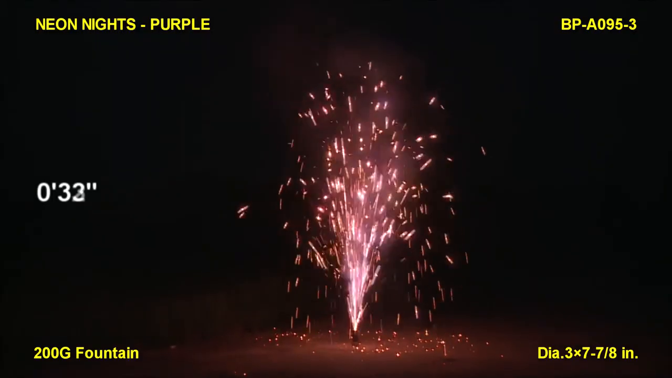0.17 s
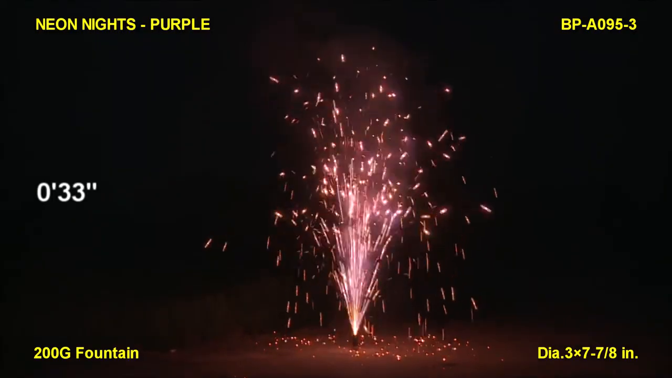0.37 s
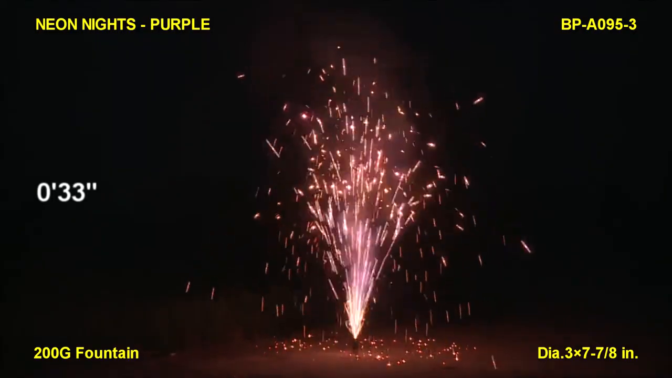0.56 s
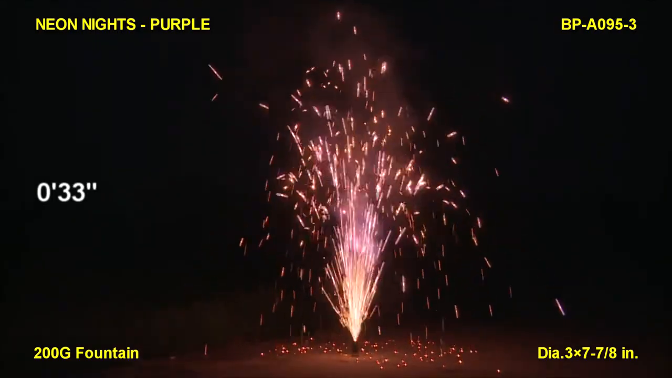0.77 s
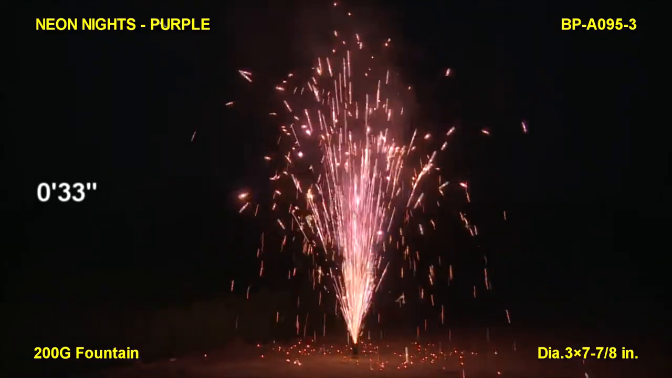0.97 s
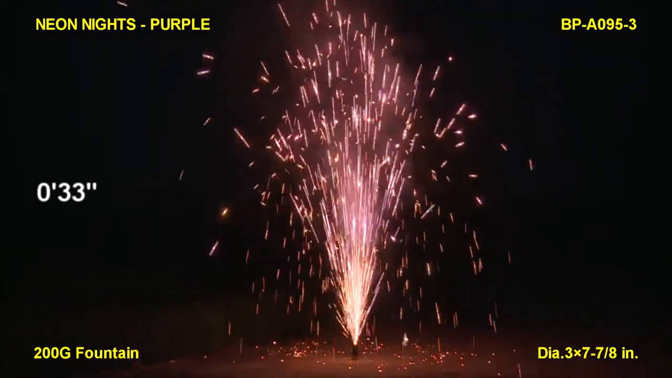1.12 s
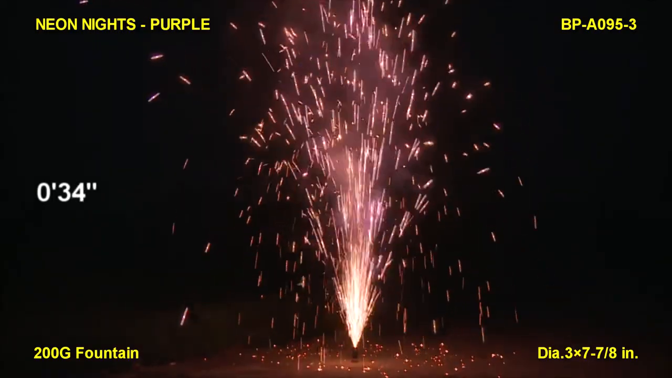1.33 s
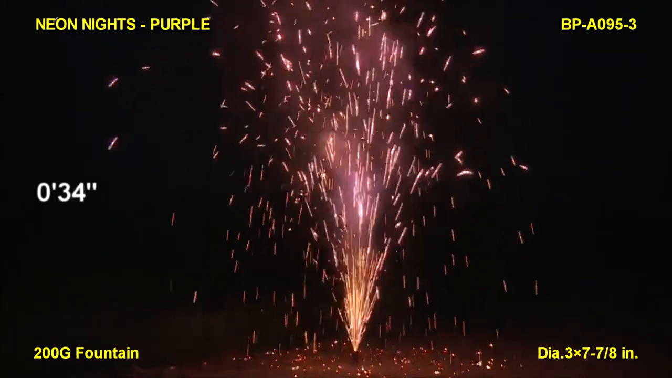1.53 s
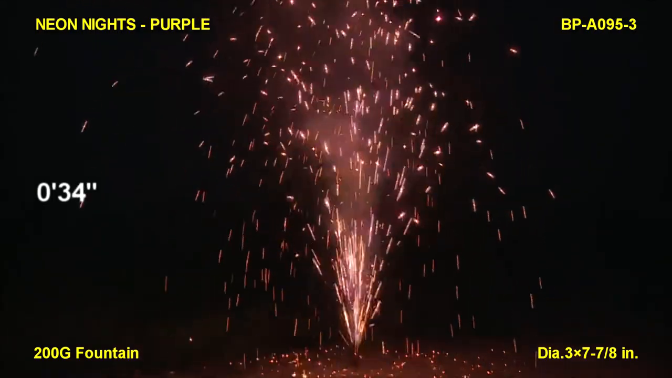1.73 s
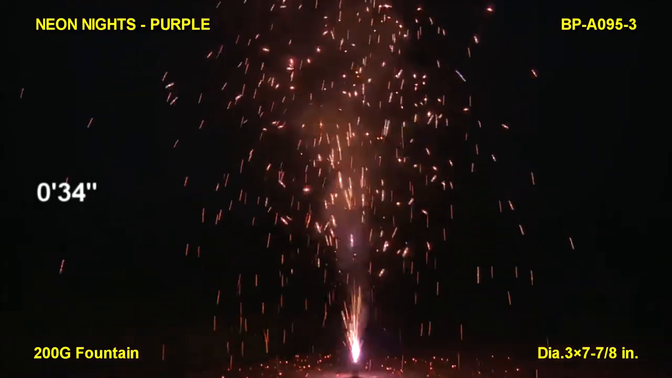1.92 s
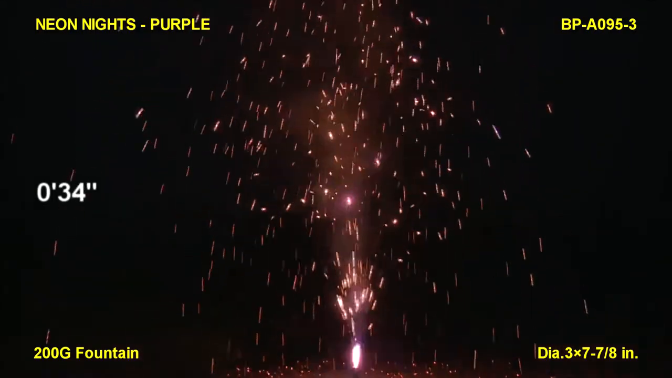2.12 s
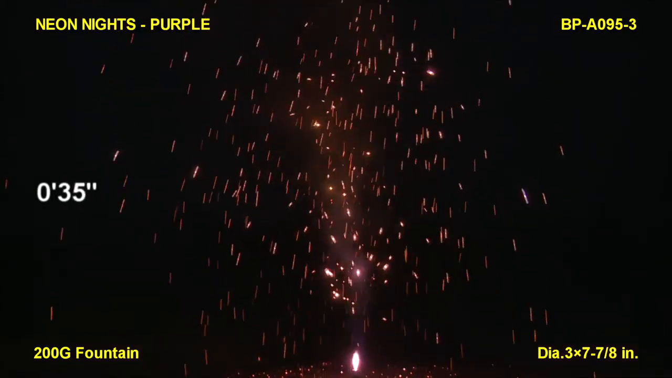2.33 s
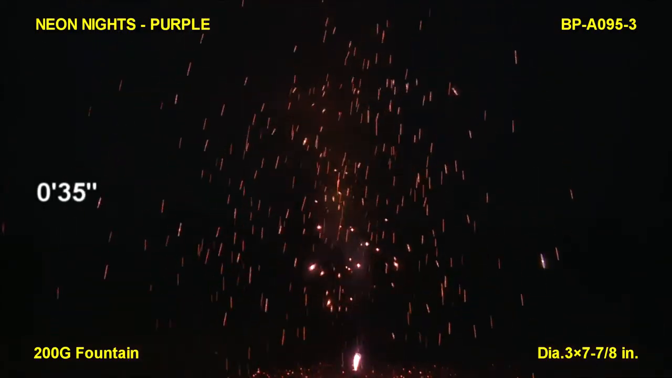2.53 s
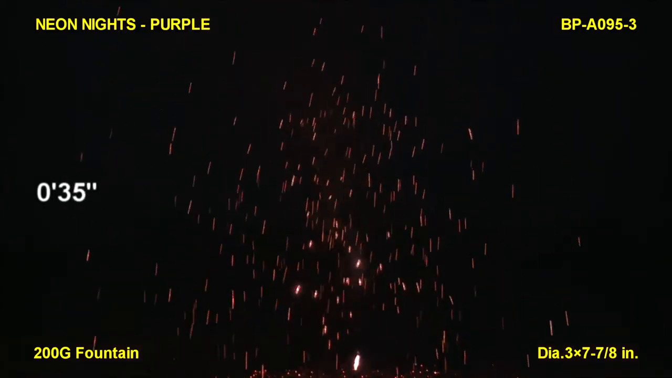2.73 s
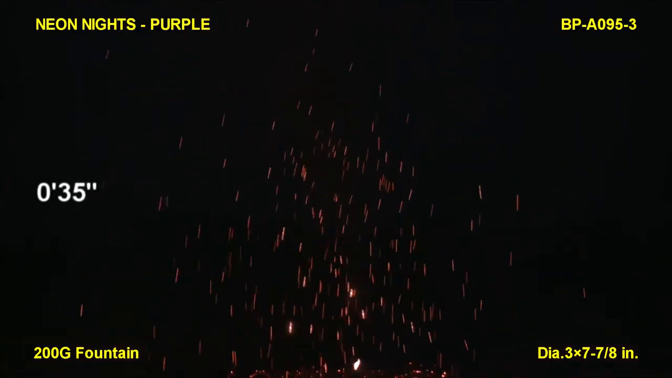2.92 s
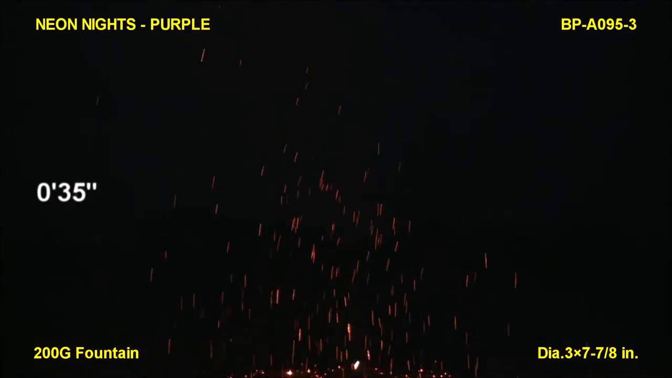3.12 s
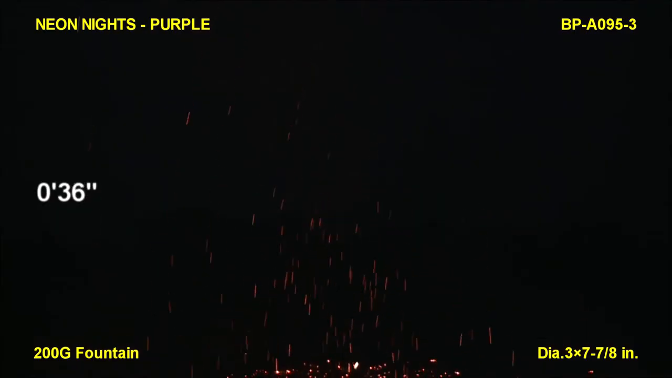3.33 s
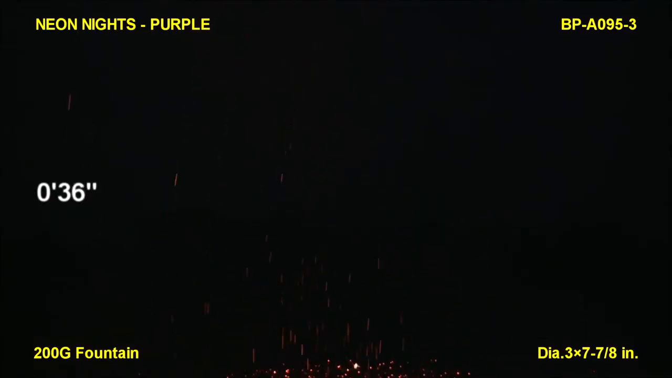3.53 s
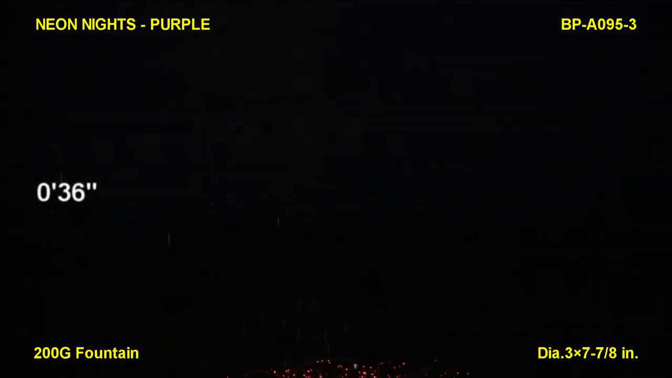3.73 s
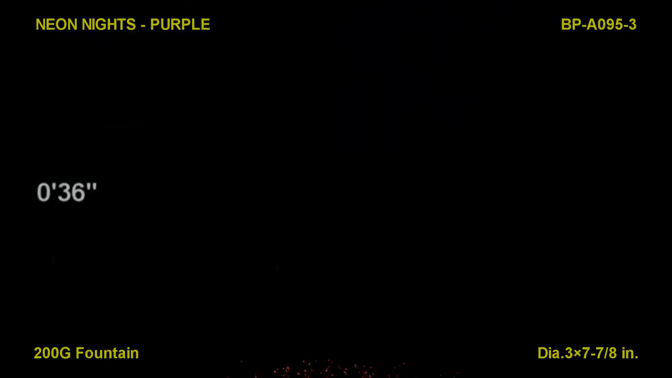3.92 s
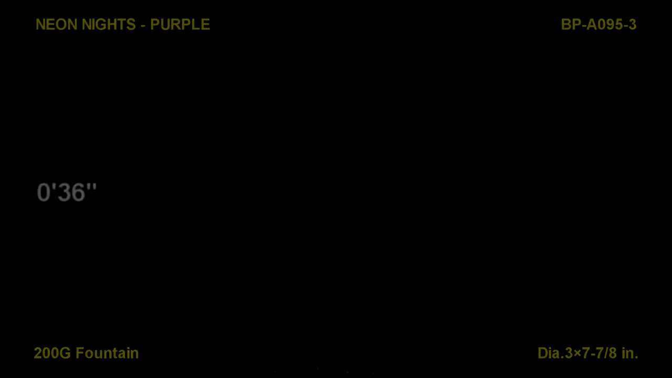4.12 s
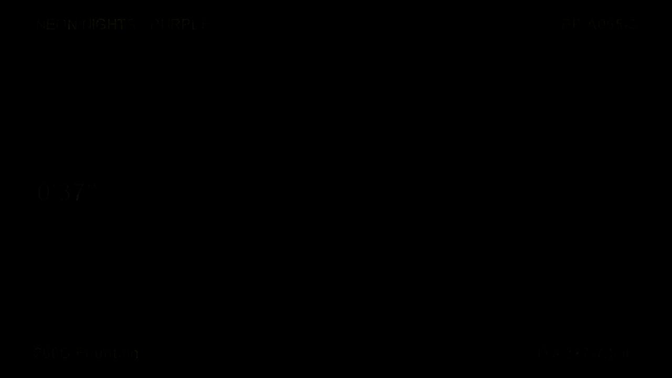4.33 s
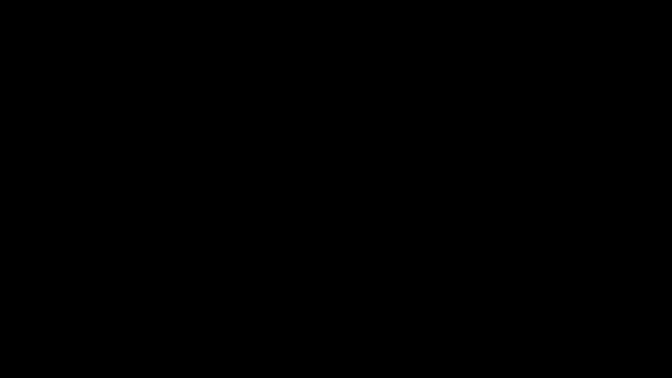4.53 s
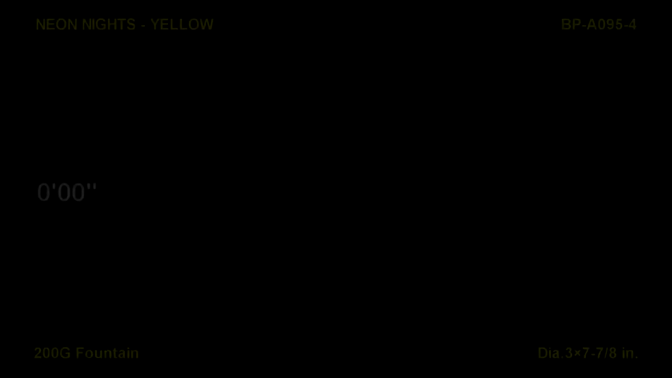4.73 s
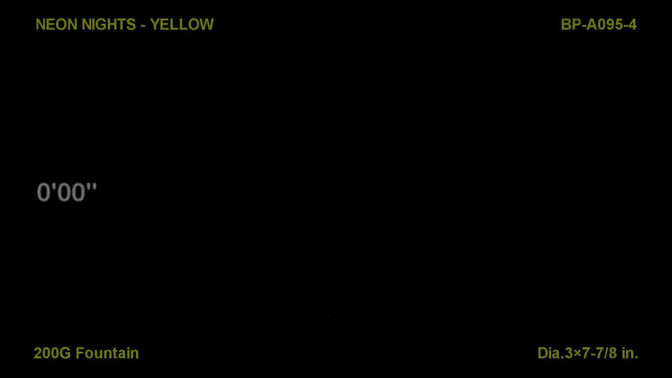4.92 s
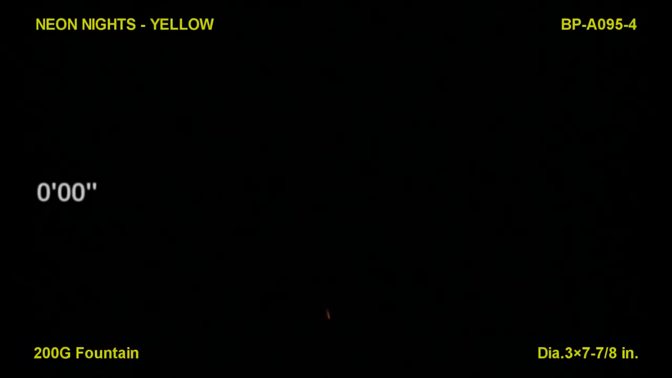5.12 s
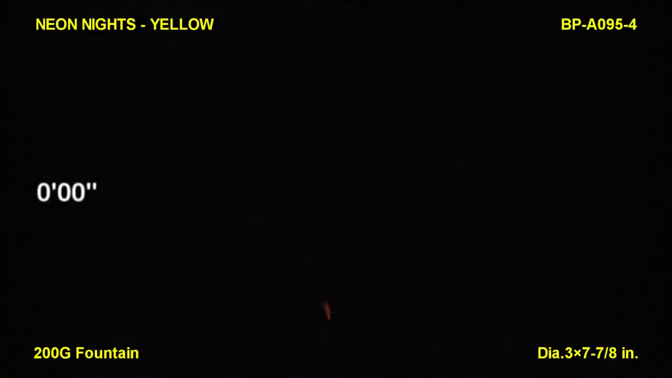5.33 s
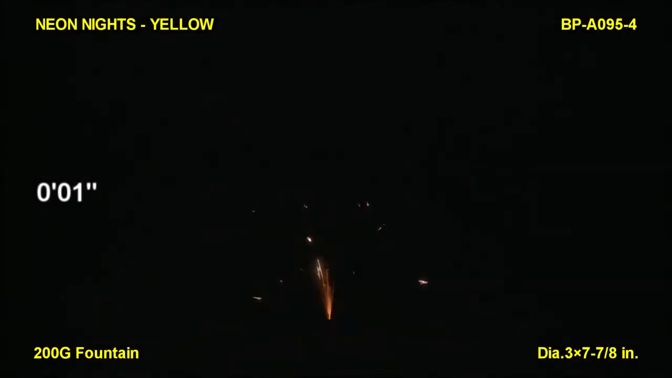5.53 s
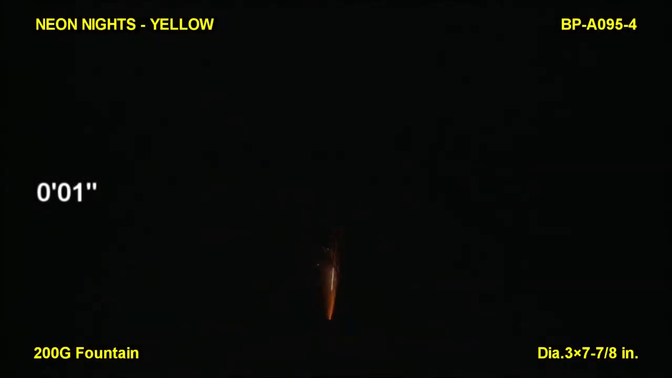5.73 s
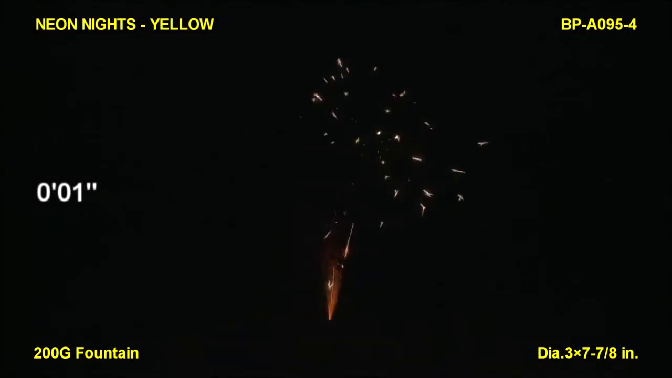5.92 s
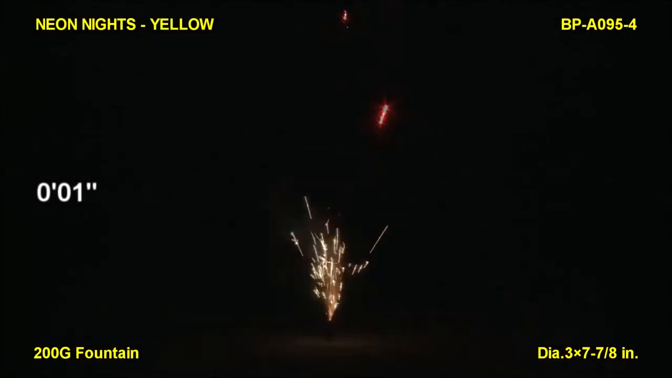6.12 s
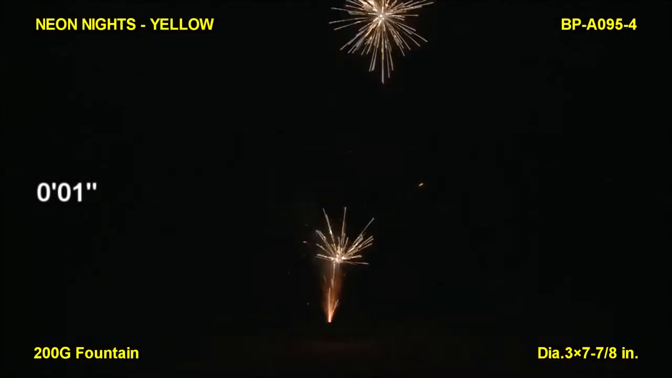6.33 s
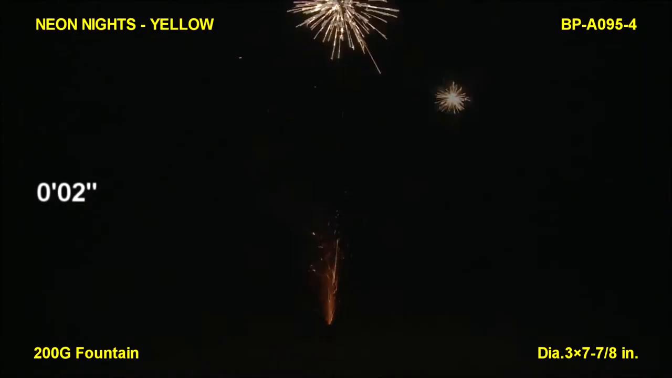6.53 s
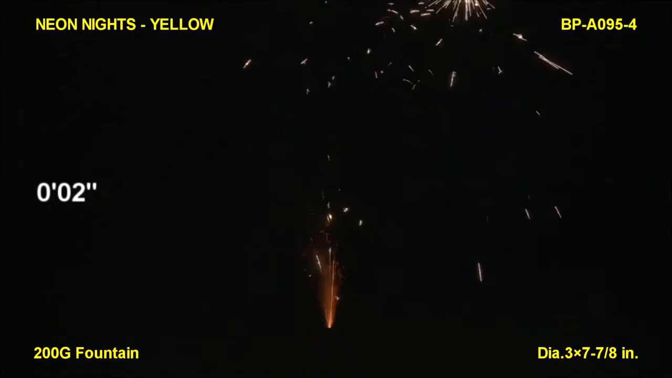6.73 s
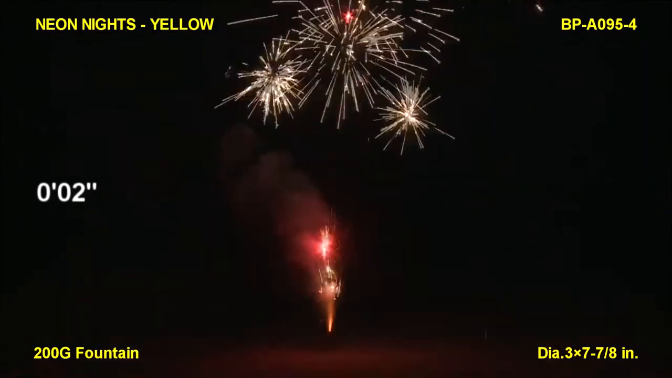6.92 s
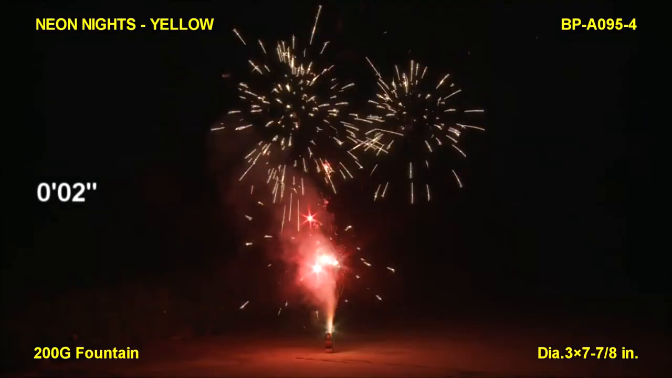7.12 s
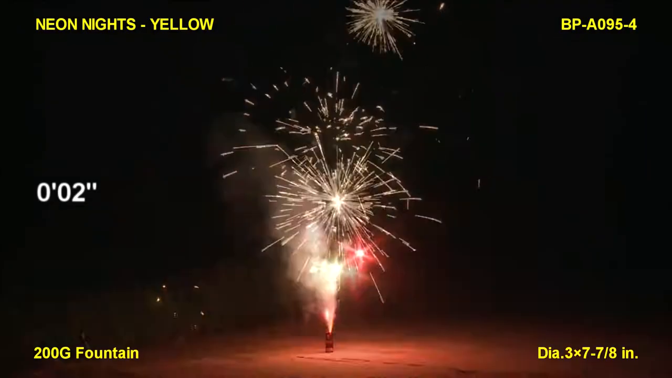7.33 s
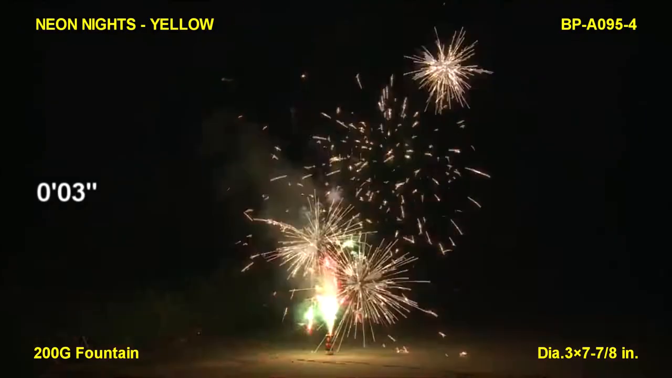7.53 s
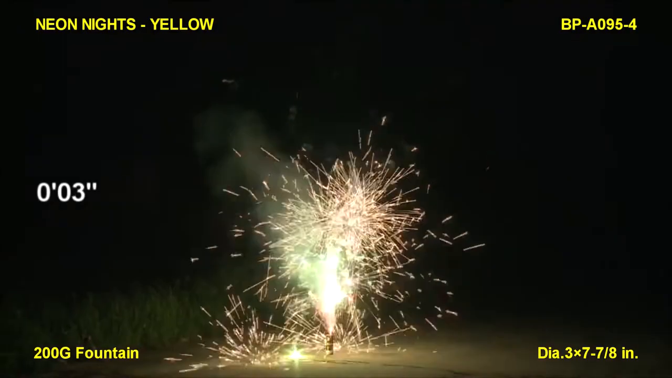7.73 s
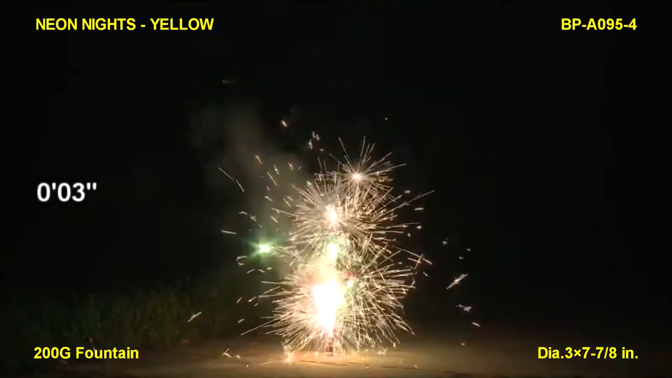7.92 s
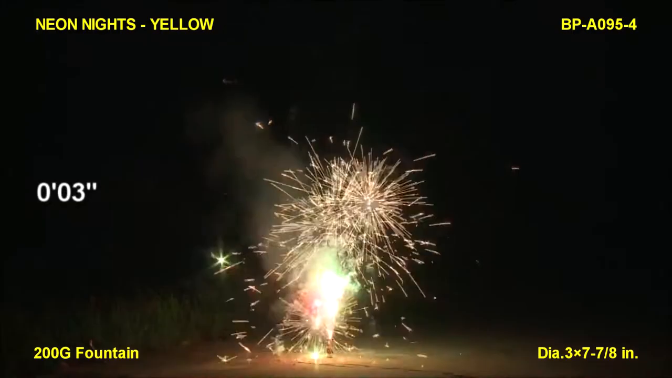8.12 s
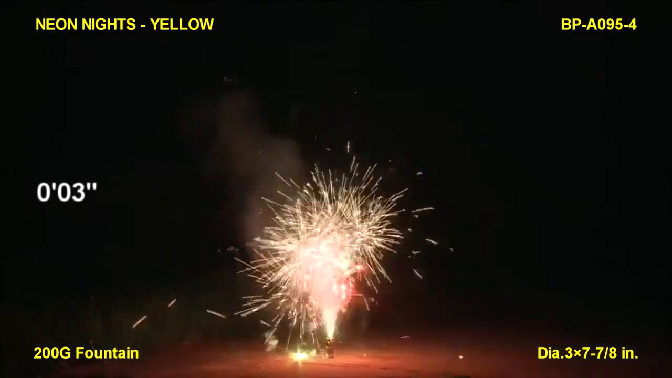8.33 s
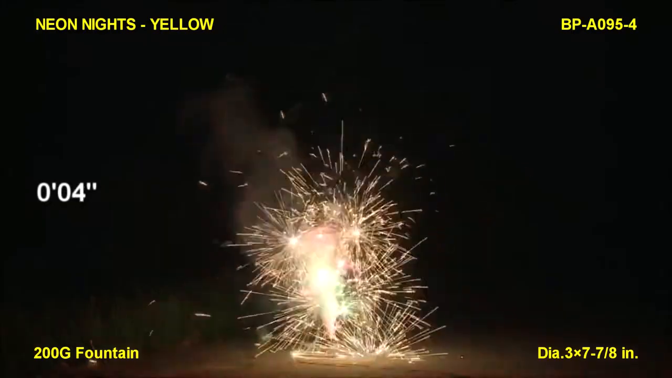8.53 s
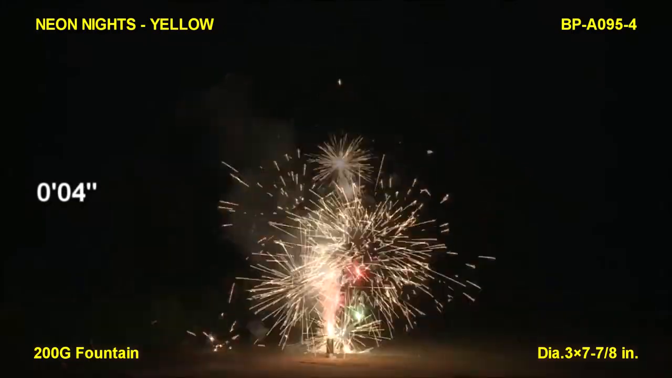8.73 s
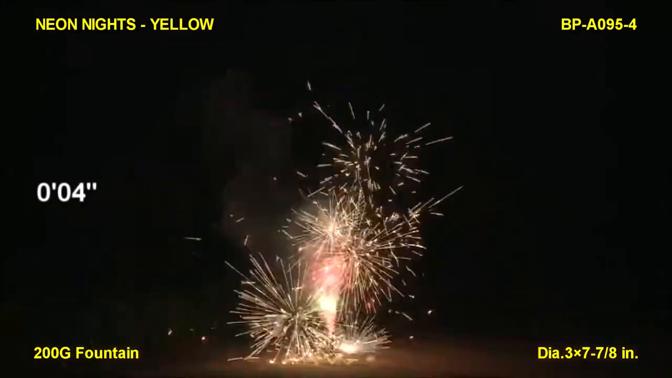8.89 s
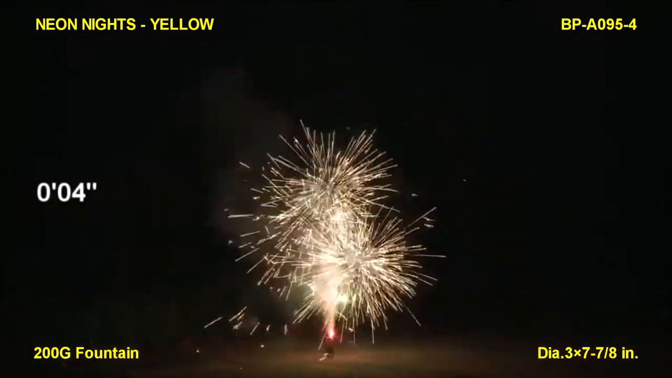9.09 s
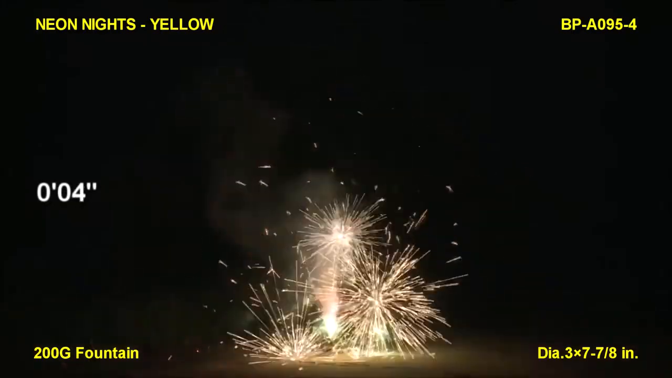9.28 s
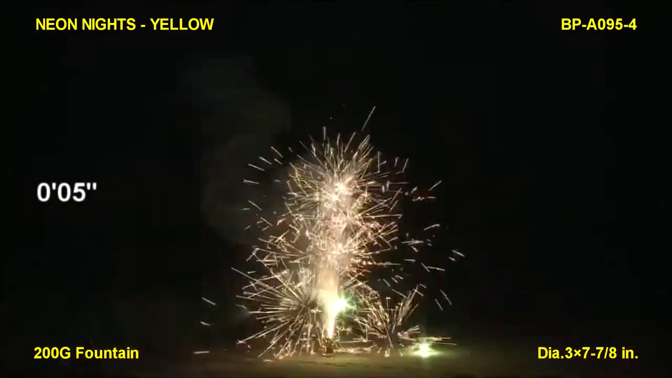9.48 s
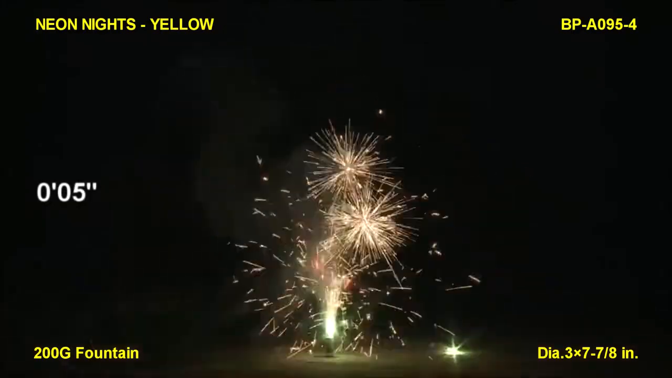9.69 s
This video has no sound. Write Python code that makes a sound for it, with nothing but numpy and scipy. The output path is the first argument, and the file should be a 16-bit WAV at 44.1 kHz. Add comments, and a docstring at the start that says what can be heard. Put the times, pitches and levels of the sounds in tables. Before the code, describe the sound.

Outdoors at night, a fountain firework hisses with an uneven, surging roar, swells, then breaks into dull coughing puffs and dies. Crickets chirp and katydids rasp over a low hum. The sound dips almost to silence and returns. A second jet lights with a soft hollow hiss; isolated sharp cracks follow, thickening into dense crackling volleys until the end. Widely spaced stereo microphones; the right hears cracks first, and the loudest distort.

```python
"""A fountain firework hisses over a warm night, sputters and burns out, leaving crickets and katydids.
The sound fades out and in; a second fountain throws crackling stars, single at first, then in dense volleys.
Jets and puffs are coloured noise with sparks, cracks are N-shaped shock waves, insects are swept tones.
Two microphones stand metres apart: the right is nearer and hears the fountains first; cracks overload both."""
import sys
import numpy as np
from scipy import signal
from scipy.fft import rfft, irfft
from scipy.io import wavfile
from scipy.ndimage import uniform_filter1d

SR = 44100
rng = np.random.default_rng(int(sys.argv[2]) if len(sys.argv) > 2 else 0)


def dump_mix(stems):
    """Bounce the given channels to the path in sys.argv[1] as a 16-bit WAV at rate SR."""
    frames = np.atleast_2d(stems).T  # one column per channel
    limited = np.clip(frames, -1, 1)  # hard clip at full scale
    pcm = np.round(limited * 32767).astype(np.int16)
    wavfile.write(sys.argv[1], SR, pcm)


N = 429975
TIME = np.arange(N) / SR  # seconds

# All levels in the tables are relative: colours, trims and the fade act on top of them.
# spectrum of the night's hum and far insects: pitch_hz, left_db, right_db
NIGHT_SPECTRUM = [(25, -74, -80.5), (59.7, -43, -63), (110, -31.5, -38), (200, -36.5, -39.5),
                  (400, -40.5, -43), (880, -38.5, -51), (1030, -36, -45.5), (1200, -38.5, -53),
                  (1470, -38, -55), (1940, -45, -58), (3900, -49, -62), (4870, -46, -68.5),
                  (6600, -66, -70), (7900, -57.5, -70), (9300, -67, -72), (10340, -52.5, -76),
                  (12800, -78, -89)]
# extra level of the night at the second fountain: left_db, right_db
LATER_NIGHT_LIFT = (0.3, 3)
# a cricket's runs of even chirps: first_s, end_s, level_db
CRICKET_RUNS = [(0.05, 4.43, -42), (4.53, 7.5, -48)]
# a small cricket's high chirps: start_s
HIGH_CHIRP_TIMES = [2.70, 4.02, 4.62, 4.81, 5.01, 5.205, 5.39]
# katydids repeating three-stroke calls: first_s, end_s, period_s, left_db, right_db
KATYDID_RUNS = [(2.708, 3.4, .2025, -46.5, -70), (3.484, 4.35, .2005, -46.5, -68),
                (3.525, 4.0, .19, -53, -55), (4.57, 5.42, .154, -50.5, -71), (4.78, 5.33, .16, -55, -73)]
# small ticks in the quiet: start_s, pitch_hz, level_db, decay_s, noisy_share (0-1)
SMALL_TICKS = [(3.513, 2900, -42.5, .002, .9), (3.564, 2600, -29.5, 0.0022, .9),
               (4.592, 1180, -29, 0.016, 0.06), (4.647, 2600, -37.5, .02, .95)]
# gas flow of each fountain over time: time_s, roar_db, hiss_db
FIRST_JET_FLOW = [(0, -42, -43.5), (.25, -40.5, -37.3), (.6, -41, -35.5), (.9, -34, -31),
                  (1.08, -34.5, -31), (1.45, -40.5, -34), (1.58, -37.5, -35), (1.86, -47.5, -48),
                  (2.12, -55, -57.5), (2.19, -38, -55), (2.68, -63.5, -82)]
SECOND_JET_FLOW = [(5.37, -58.5, -73), (5.43, -48, -47.5), (5.5, -42, -39.3), (5.8, -43.5, -49.5),
                   (6.24, -42.5, -48.5), (6.36, -39.5, -45), (7.08, -50, -49), (7.2, -48, -39),
                   (7.72, -42.5, -36.5), (9.75, -40.5, -40.5)]
# spectrum of the first jet: pitch_hz, left_db, right_db
FIRST_JET_SPECTRUM = [(40, -28, -32), (99.5, -6, -8), (196, 6, 9), (327, 13, 16), (750, 11, 7.5),
                      (1130, 12.5, 12), (1430, 3.5, 2), (2240, 7, 5), (3300, -3, 2.5), (5100, -8.5, 0.5),
                      (10900, -8.5, -4), (15000, -16, -16)]
# spectrum of the second jet, whose tube resonates near 400 and 1150 Hz: pitch_hz, left_db, right_db
SECOND_JET_SPECTRUM = [(50, -6, -10), (220, -1.5, 0), (400, 14, 14), (620, 8.5, 7.5), (890, 4.5, 3.5),
                       (1140, 18, 16.5), (1370, 10, 5.5), (2340, 10.5, 11), (5770, -3, 2), (10600, -6, -4),
                       (15100, -10, -9)]
# surges of the first jet's roar as it burns unevenly: crest_s, lift_db
ROAR_SURGES = [(.175, 2), (.275, 5), (.435, 5.5), (.59, 4), (.76, 4.5), (.885, 4.8), (1.0, 2), (1.075, 5),
               (1.2, 0), (1.29, 4.5), (1.355, 8.5), (1.49, 2.5)]
SURGE_WIDTH_S = .024
# coughs of the first fountain, mostly as it dies: start_s, length_s, level_db, puff_decay_s
COUGH_RUNS = [(.032, 0, -21, 0.0026), (1.655, 0.048, -16, .009), (1.741, 0.0091, -14, 0.0076),
              (1.795, 0, -22.5, .006), (1.913, 0.097, -18.5, .014), (2.096, 0, -30, .011),
              (2.149, 0.007, -21.5, 0.0081)]
PUFFS_PER_S, COUGH_SAG_DB_PER_S = 60, 54
UNEVEN = 0.384  # scatter of the puffs in a cough, as a share of their mean spacing
# spectrum of the puffs: pitch_hz, left_db, right_db
PUFF_SPECTRUM = [(30, -25, -35), (97, 5.5, 9), (284, 16, 18), (827, 15.5, 13), (1490, 3.5, 4.8),
                 (3040, -6.5, -5), (6100, -26, -22), (14000, -41, -40.5)]
# dense volleys, with countless small sparks among the stars: start_s, length_s, level_db
SPARK_VOLLEYS = [(7.203, 0.076, -21), (7.387, .03, -24), (7.478, .04, -25), (7.65, 0.18, -13.5),
                 (7.87, 0.027, -26), (7.943, 0.31, -21), (8.44, .05, -18), (8.538, .12, -16),
                 (8.75, 0.15, -19.5), (8.908, .04, -20), (9.01, .025, -25), (9.095, .05, -22),
                 (9.235, 0.16, -17.5), (9.45, .09, -14.5), (9.6, 0.028, -33), (9.655, 0.069, -23)]
# spectrum of the small sparks: pitch_hz, left_db, right_db
SIZZLE_SPECTRUM = [(60, -20, -14), (380, -3, 1), (1300, -2, -3), (2300, 0, -1.5), (3500, -2, 0),
                   (5200, -5, -4.5), (8000, -2, -6), (10600, -2, -6), (15500, -12, -7)]
SIZZLE_RELEASE_S = 0.01
# cracking stars, timed at the near microphone: start_s, level_db
STAR_CRACKS = [(5.4619, 0.5), (5.8821, 4.5), (6.1137, -4), (6.36, 3), (6.442, 4.5), (6.536, -3),
               (6.586, -0.5), (6.685, 5), (6.6926, 1), (6.7578, -4.5), (6.8373, 6.5), (6.9265, 7.5),
               (6.941, 3.5), (7.0985, 4.0), (7.1174, 6.5), (7.1909, 4.0), (7.2118, 2), (7.2174, 1),
               (7.2406, 6.5), (7.3035, 4.5), (7.3355, 6.5), (7.3737, 1.0), (7.3763, 2.5), (7.3982, 5),
               (7.4034, 4.5), (7.4132, 3), (7.4555, 0), (7.472, 5), (7.4843, 8), (7.487, -0.5), (7.495, 2),
               (7.5047, 6), (7.5584, 6), (7.5965, 5.5), (7.6219, 3), (7.6477, 5.0), (7.6631, 4.5),
               (7.6655, 3), (7.6753, 7.5), (7.6815, 6), (7.684, 4), (7.7006, 9.5), (7.7056, 5.5),
               (7.716, 5.0), (7.729, 6), (7.7553, 6.5), (7.7738, 5), (7.7812, 6.5), (7.7946, 2),
               (7.7993, 4.5), (7.8077, 2), (7.8672, 6.5), (7.8763, 6.0), (7.8846, 3.5), (7.8938, 6),
               (7.897, -0.5), (7.9026, 6.0), (7.9404, 4), (7.948, 3.5), (7.9543, 2), (7.9757, 8.5),
               (7.9796, 1), (7.9952, 5), (8.017, 5.5), (8.0273, 5.0), (8.0482, 5.5), (8.059, 3.5),
               (8.0655, 2.5), (8.0938, 6.5), (8.1283, 4.5), (8.1447, 5.5), (8.1684, 7), (8.183, 3.5),
               (8.1949, 6), (8.2129, 5.5), (8.2251, 3), (8.2349, 3), (8.2576, 4), (8.2945, 6.0),
               (8.3288, 6.5), (8.352, 1.5), (8.3548, 5.5), (8.3674, 1.5), (8.3986, 5.5), (8.4145, 6),
               (8.4315, 4.5), (8.458, 4.0), (8.4782, 5.5), (8.504, 3.5), (8.5257, 6.5), (8.5312, 2.5),
               (8.5508, 7), (8.5615, 7.5), (8.5784, 4), (8.5812, 7), (8.5926, 1.5), (8.5994, 5.5),
               (8.603, 2.5), (8.608, 5), (8.6257, 5), (8.633, 2), (8.6407, 4.5), (8.6473, 2), (8.6532, 3),
               (8.7024, 5), (8.7189, 3.5), (8.7325, 2), (8.7423, 7.5), (8.7555, 2.5), (8.784, 4.5),
               (8.7928, 5.0), (8.7967, 2.5), (8.805, 5), (8.8079, 1), (8.812, 6.5), (8.8276, 4.5),
               (8.8634, 6), (8.8846, 4), (8.9142, 4), (8.9163, 6.0), (8.9376, 4.5), (8.9425, 2.0),
               (8.9686, 7.5), (9.0208, 4.5), (9.0275, 6.5), (9.0484, 3), (9.0849, 2.5), (9.0966, 4.0),
               (9.1096, 5.5), (9.113, 6), (9.1255, 2.5), (9.1474, 3), (9.1796, 3), (9.184, 4), (9.2136, 5),
               (9.2247, 5), (9.2369, 4), (9.2454, 6.5), (9.2569, 6), (9.2749, 4.5), (9.282, 1.5),
               (9.299, 5), (9.3153, 6.5), (9.3368, 8.5), (9.3613, 7), (9.3755, 4.5), (9.4106, 4.0),
               (9.445, 4.5), (9.4577, 3.5), (9.4636, 5.5), (9.4795, 8.5), (9.4838, 5), (9.4969, 4),
               (9.5151, 6.0), (9.5346, 5.5), (9.5388, 1), (9.5933, 0), (9.5971, 5.0), (9.6188, 3.0),
               (9.645, 9), (9.6517, 4.5), (9.6612, 2.5), (9.7304, 3.5), (9.7355, 2.5)]
# spectrum of the cracks: pitch_hz, left_db, right_db
CRACK_SPECTRUM = [(40, 6.5, 15), (109, 0.57, 14.5), (335, 10.3, 15), (603, 7.2, 8), (1050, 10.8, 6),
                  (1310, 8.5, 3.5), (1800, 10, 1.5), (2330, 13.5, 2), (2920, 8.7, 1), (4330, 4.1, 2),
                  (5150, 2.5, 5.5), (7100, 2.7, 9), (10760, 15.3, 10.5), (12400, 9.1, 7),
                  (16000, 6.5, -0.5)]
FAR_LAG_S = .01245  # extra travel from the tube to the far microphone
STAR_LAG_S, STAR_LAG_SPREAD_S = .0122, .0009  # the same from a star, depending on where it bursts
# fade between the two fountains: time_s, level_db
FADE_CURVE = [(4.0, -9.5), (4.38, -17.5), (4.49, -33), (4.58, -15.5), (4.9, -7.5)]
TOP_HZ = 15900  # the treble ends here


def undb(db):
    """Decibels to gain."""
    return 10 ** (np.asarray(db) / 20)


def curve(rows):
    """The columns of a table, joined by straight lines in time."""
    s, *columns = np.transpose(rows)
    return [np.interp(TIME, s, c) for c in columns]


def add(track, s, sound):
    """Mix a sound into a track at time s."""
    i = max(int(s * SR), 0)
    part = sound[..., :max(N - i, 0)]
    track[..., i:i + part.shape[-1]] += part


def convolve(x, response):
    """Pass sound through one response for each microphone."""
    return signal.fftconvolve(x, response, axes=-1)[:, :N]


def colour(x, table, size=4096):
    """Causal minimum-phase filter with a left and a right spectrum."""
    hz, *sides = np.transpose(table)
    log_hz = np.log(np.maximum(np.fft.rfftfreq(size, 1 / SR), 1))
    gains = undb([np.interp(log_hz, np.log(hz), side) for side in sides])
    # folding the cepstrum forward keeps the response from starting early
    cepstrum = irfft(np.log(gains))
    cepstrum[:, 1:size // 2] *= 2
    cepstrum[:, size // 2 + 1:] = 0
    return convolve(x, irfft(np.exp(rfft(cepstrum))))


def band(x, lo_hz, hi_hz):
    """Gentle band-pass."""
    return signal.sosfilt(signal.butter(2, [lo_hz, hi_hz], "band", fs=SR, output="sos"), x)


def walk(rate):
    """Smooth random wander with a spread of 1, taking rate steps per second."""
    k = int(SR / rate)
    steps = np.repeat(rng.standard_normal(N // k + 1), k)
    wander = uniform_filter1d(steps, k)[:N]
    return wander / wander.std()


def sparks(per_s, spread_db):
    """Tiny random clicks of very uneven size, rms 1."""
    size_db = spread_db * np.minimum(rng.exponential(size=N), 4)
    lit = rng.random(N) < per_s / SR
    clicks = lit * rng.choice([-1, 1], N) * undb(size_db)
    return clicks / clicks.std()


def both_mics(x):
    """Sound from the tube reaches the far, left microphone later."""
    return np.array([np.interp(TIME - FAR_LAG_S, TIME, x, left=0), x])


def surroundings(x, db, t60):
    """Grass and trees return a thin, dull tail."""
    t = TIME[:SR]
    tail = band(rng.standard_normal((2, SR)) * undb(-60 * t / t60) * (t > .011), 150, 4300)
    return x + convolve(x, undb(db) * tail / np.linalg.norm(tail, axis=1, keepdims=True))


def scatter(x, start_s, decay_s, spread_db):
    """Each burst returns from many small things along paths of its own: a grainy, fading hiss of equal energy."""
    t = TIME[:SR // 2]
    fading = np.exp(-t / decay_s) * (t > start_s)
    power = np.maximum(convolve(x ** 2, fading[None] / fading.sum()), 0)
    graininess = undb(spread_db * np.minimum([walk(700), walk(700)], 2))
    grains = rng.standard_normal((2, N)) * graininess
    grains = signal.sosfilt(signal.butter(1, [1700, 5500], "band", fs=SR, output="sos"), grains)
    return np.sqrt(power) * grains / grains.std()


def night():
    """Distant hum of the land and a far chorus of insects: coloured noise that wanders slowly in level."""
    later = TIME > 4.6
    level_db = 0.4 * walk(3.5) + np.outer(LATER_NIGHT_LIFT, later)
    return colour(rng.standard_normal((2, N)) * undb(level_db), NIGHT_SPECTRUM)


def stroke(length_s, pitch_hz):
    """One wing stroke: a rounded tone whose pitch follows the speed of the scraper."""
    u = np.linspace(0, 1, int(length_s * SR))
    bend = np.polyfit(np.linspace(0, 1, len(pitch_hz)), pitch_hz, len(pitch_hz) - 1)
    hz = np.polyval(bend, u)
    return np.sin(np.pi * u) ** 1.4 * np.sin(2 * np.pi * np.cumsum(hz) / SR)


def crickets():
    """Crickets rub out chirps and trills, each a train of wing strokes at a nearly fixed pitch."""
    out = np.zeros(N)
    for first, end, db in CRICKET_RUNS:
        for s in np.arange(first, end, .1456):
            # each chirp arches up, then sags in pitch as it dies away
            chirp = stroke(.14, np.array([3150, 3245, 2960]) * (1 + 0.0019 * rng.normal()))
            dying = np.linspace(1, .25, len(chirp))
            # started early, so that the table's time falls near the crest
            add(out, s - .05, undb(db + 6 + .6 * rng.normal()) * chirp * dying)
    # a second cricket trills, with one short break
    for s in np.r_[np.arange(4.655, 4.95, .0167), np.arange(5.035, 5.9, .0167)]:
        trill_s, trill_db = s + 0.00015 * rng.normal(), -41.5 + 0.76 * rng.normal()
        add(out, trill_s, undb(trill_db) * stroke(0.018, [3190, 2890]))
    # a small one chirps high, four strokes at a time
    for s in HIGH_CHIRP_TIMES:
        for k in range(4):
            add(out, s + .0225 * k, undb(-57.5) * stroke(0.021, [6370, 6280]))
    return out


def katydids():
    """Katydids rasp three falling wing strokes to a call, at a steady pace."""
    out = np.zeros((2, N))
    calls = [(s, side_db) for first, end, period, *side_db in KATYDID_RUNS
             for s in np.arange(first, end, period)]
    # others answer faintly from farther away
    answers = zip(rng.uniform(3.5, 4.9, size=12), rng.normal(size=12))
    calls += [(s, [-57 + 2 * near, -66]) for s, near in answers]
    for s, side_db in calls:
        for k in range(3):
            sweep = stroke(0.036, np.array([5400, 5000, 4350]) * (1 + 0.0154 * rng.normal()))
            add(out, s + .037 * k, undb(np.array(side_db) + rng.normal())[:, None] * sweep)
    return out


def insects():
    """Crickets and katydids, mostly in the grass on the left, with the tail of the surroundings."""
    return surroundings(crickets() * undb([[0], [-23]]) + katydids(), db=-15.0, t60=0.27)


def ticks():
    """Small ticks and a brief ping close to the left microphone: decaying noise mixed with a tone."""
    out, t = np.zeros((2, N)), TIME[:SR // 8]
    for s, hz, db, decay, noisy in SMALL_TICKS:
        rustle = band(rng.standard_normal(len(t)), hz * 0.69, hz * 1.24)
        ping = np.sin(2 * np.pi * hz * t)
        body = noisy * rustle / rustle.std() + (1 - noisy) * ping
        add(out[0], s, undb(db) * np.exp(-t / decay) * body)
    return out


def surges():
    """Gain of the first jet's roar as it surges and sinks back."""
    return undb(sum(db * np.exp(-((TIME - s) / SURGE_WIDTH_S) ** 2) for s, db in ROAR_SURGES))


def jet(rows, spectrum, spark_share, spark_rate, spark_db, flutter_db, shared, surge=1):
    """Turbulent gas roars out of the nozzle while burning grains fizz in the plume."""
    def fizzing_gas():
        turbulence = rng.standard_normal(N)
        return np.sqrt(1 - spark_share) * turbulence + np.sqrt(spark_share) * sparks(spark_rate, spark_db)

    roar_db, hiss_db = curve(rows)
    lit_s, out_s = rows[0][0], rows[-1][0]
    burning = np.interp(TIME, [lit_s - .06, lit_s - .03, out_s, out_s + .15], [0, 1, 1, 0])
    flutter = undb(flutter_db * walk(45))
    # the nozzle is one point for both microphones; the wide plume differs between them
    nozzle = both_mics(fizzing_gas() * flutter)
    plume = np.array([fizzing_gas(), fizzing_gas()]) * flutter
    gas = colour(np.sqrt(shared) * nozzle + np.sqrt(1 - shared) * plume, spectrum)
    # the roar lies below 2600 Hz, the hiss is the rest
    roar = signal.sosfiltfilt(signal.butter(2, 2600, fs=SR, output="sos"), gas)
    hiss = gas - roar
    roar_gain = surge * undb(roar_db + 8.5 + 0.53 * walk(12))
    return burning * (roar * roar_gain + hiss * undb(hiss_db + 10))


def run_of(start_s, length_s, per_s, chance):
    """Times of a run of bursts: the first opens it, the others follow unevenly."""
    k = np.arange(min(1 + round(max(length_s * per_s, 0)), len(chance)))
    places = np.abs(k + UNEVEN * chance[k] * (k > 0))
    return start_s + places * length_s / max(k[-1], 1)


def sputter(push_db, rush_db):
    """Each puff is a short push of gas with a turbulent rush behind it; they weaken as a cough spends itself."""
    out, t = np.zeros(N), TIME[:SR // 4]
    chances = rng.standard_normal(size=(len(COUGH_RUNS), 12))
    push = -np.exp(-t / 0.0003)
    for (start, length, db, decay), chance in zip(COUGH_RUNS, chances):
        turbulence = rng.standard_normal(N)
        for s in run_of(start, length, PUFFS_PER_S, chance):
            rush = turbulence[int(s * SR):][:len(t)] * np.exp(-t / decay)
            puff_db = db - COUGH_SAG_DB_PER_S * (s - start)
            add(out, s, undb(puff_db) * (undb(push_db) * push + undb(rush_db) * rush))
    return colour(both_mics(out), PUFF_SPECTRUM)


def sizzle(per_s, spread_db):
    """Small sparks snap all over the plume while a volley lasts, and die away soon after it."""
    drive = sum(undb(db) * ((TIME > start) & (TIME < start + length)) for start, length, db in SPARK_VOLLEYS)
    keep = np.exp(-1 / (SIZZLE_RELEASE_S * SR))
    drive = signal.lfilter([1 - keep], [1, -keep], drive)
    snaps = np.array([sparks(per_s, spread_db), sparks(per_s, spread_db)])
    return colour(drive * snaps, SIZZLE_SPECTRUM)


def shock(length_s, bounce_s, bounce_gain):
    """An N-shaped pressure wave with a spiked front, and its stretched reflection off the ground."""
    t = np.arange(SR // 125) / (4 * SR)  # drawn at four times the sample rate
    wave = np.zeros(len(t))
    for gain, u in [(1, t / length_s), (bounce_gain, (t - bounce_s) / (1.134 * length_s))]:
        wave += gain * (2 * u - 1) * (u >= 0) * (u < 1)
    front = -.9 * np.exp(-t / .00003)
    return signal.resample_poly(np.r_[np.zeros(16), wave + front], 1, 4)


def crackle(length_s, near_db, far_db, second_db, echo_db):
    """Stars burst at different places in the plume; a stronger burst makes a longer wave."""
    out = np.zeros((2, N))
    chances, places = rng.random(size=(400, 4)), rng.standard_normal(size=400)
    for (s, db), (stretch, height, slant, side), place in zip(STAR_CRACKS, chances, places):
        star_length_s = length_s * undb(db / 2) * (0.75 + 0.36 * stretch)
        wave = undb(db) * shock(star_length_s, .00017 + 0.00023 * height, 1.0)
        add(out[1], s, undb(near_db) * wave)
        far_s, far = s + STAR_LAG_S + STAR_LAG_SPREAD_S * place, undb(far_db) * wave
        add(out[0], far_s, far)
        # a surface close to the far microphone doubles the crack; more distant ones return faint slaps
        add(out[0], far_s + 0.001109 + .0012 * slant, undb(second_db) * far)
        for delay_s in (.023, .0265, .036):
            add(out[0], far_s + delay_s + .003 * side, undb(echo_db) * far)
    rattle = undb([[-6], [-15]]) * scatter(out, start_s=.0001, decay_s=0.0012, spread_db=2.0)
    grass = undb([[-10], [-15]]) * scatter(out, start_s=0.0078, decay_s=0.018, spread_db=7.5)
    trees = band(scatter(out, start_s=0.015, decay_s=0.036, spread_db=6.5), 100, 5800)
    trees *= undb([[-19], [-25]])
    return colour(out + rattle + grass + trees, CRACK_SPECTRUM)


def scene():
    """Both fountains and the night around them, under one fade."""
    background = night() + insects() + ticks()
    first = jet(FIRST_JET_FLOW, FIRST_JET_SPECTRUM, spark_share=0.42, spark_rate=3000, spark_db=2.0,
                flutter_db=1.5, shared=0.69, surge=surges())
    second = jet(SECOND_JET_FLOW, SECOND_JET_SPECTRUM, spark_share=0.4, spark_rate=2500, spark_db=3,
                 flutter_db=1.4, shared=0.6)
    coughs = surroundings(sputter(push_db=2.5, rush_db=1.5), db=-15, t60=0.29)
    small_sparks = sizzle(per_s=3000, spread_db=2.8)
    cracks = crackle(length_s=0.00017, near_db=0.5, far_db=-5.5, second_db=-3, echo_db=-13)
    return (background + first + second + coughs + small_sparks + cracks) * undb(curve(FADE_CURVE)[0])


def record(dry):
    """The loudest cracks hit the input's ceiling; coupling capacitors block the offset; the top is cut."""
    clipped = dry / (1 + dry ** 8) ** (1 / 8)
    coupled = signal.sosfilt(signal.butter(1, 12, "high", fs=SR, output="sos"), clipped)
    return signal.sosfilt(signal.ellip(8, .2, 70, TOP_HZ, fs=SR, output="sos"), coupled)


dry = scene()
out = record(dry)
dump_mix(out)
```